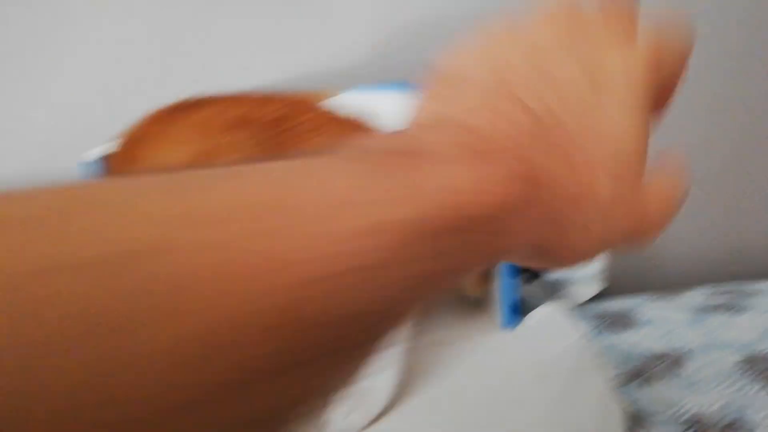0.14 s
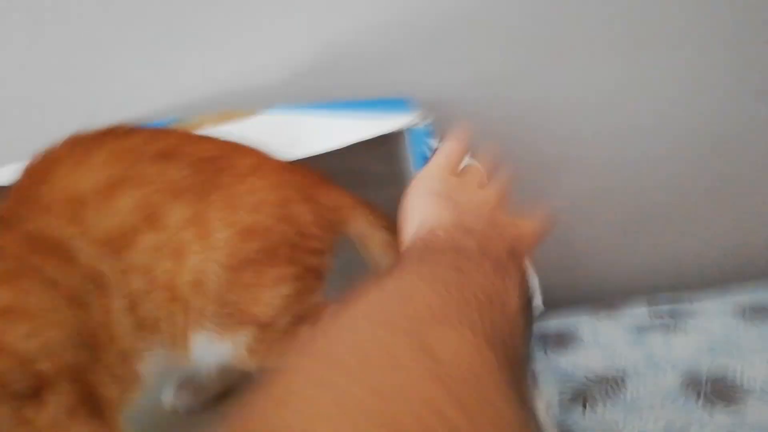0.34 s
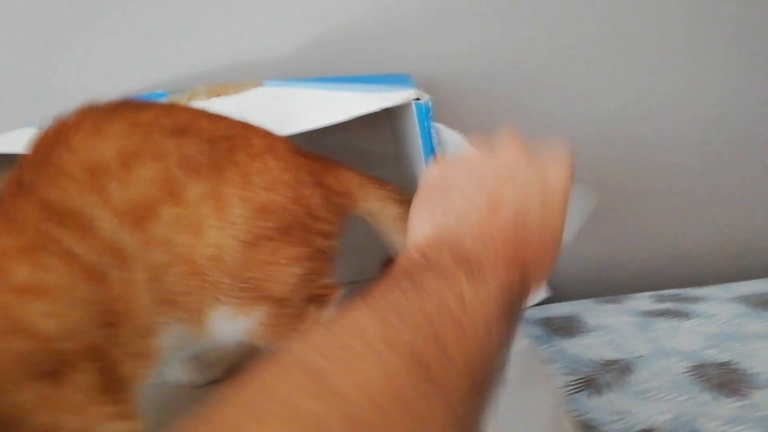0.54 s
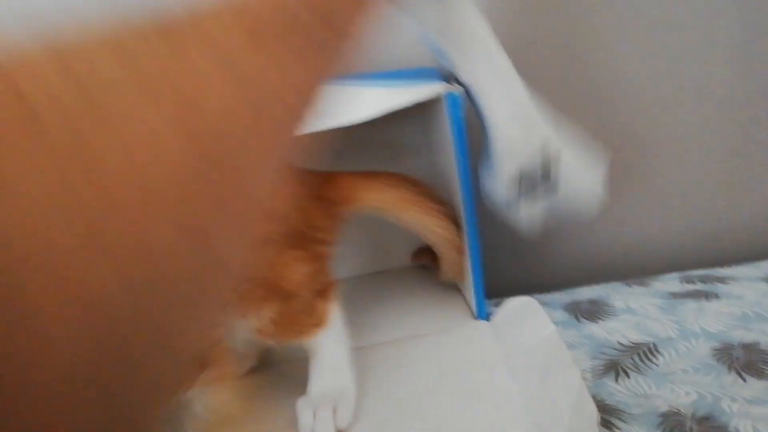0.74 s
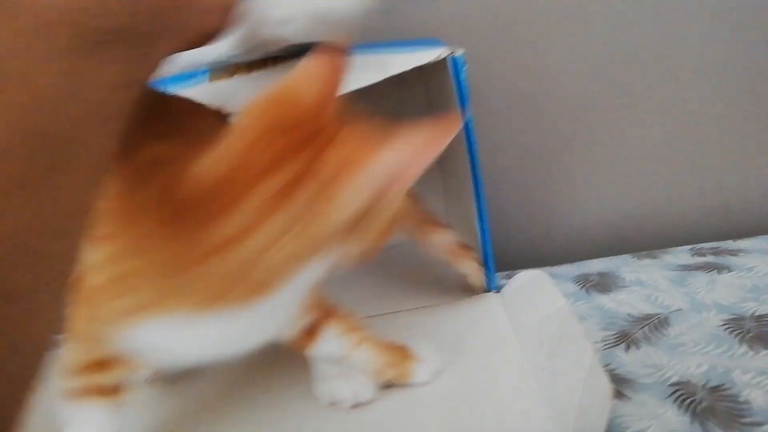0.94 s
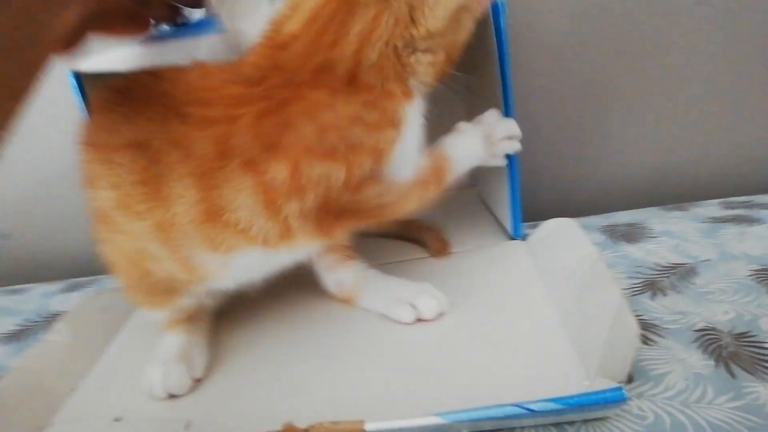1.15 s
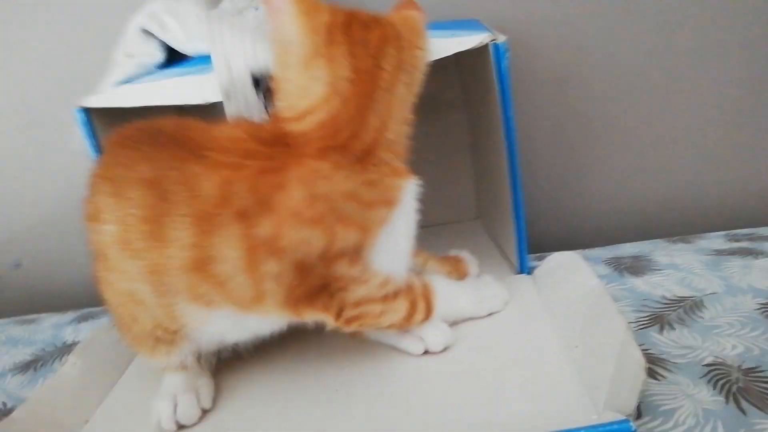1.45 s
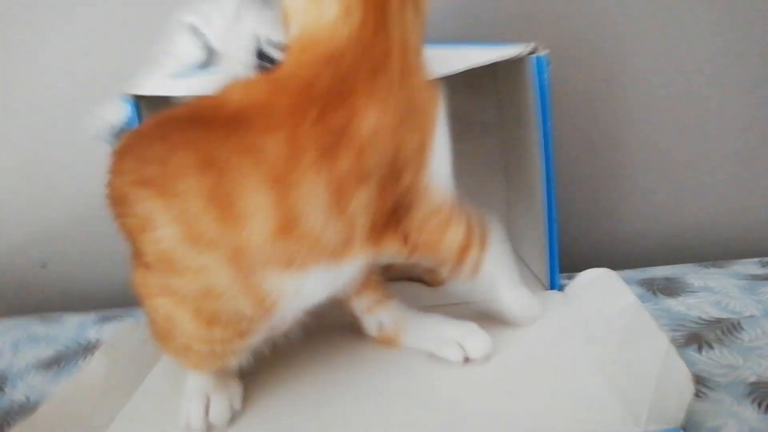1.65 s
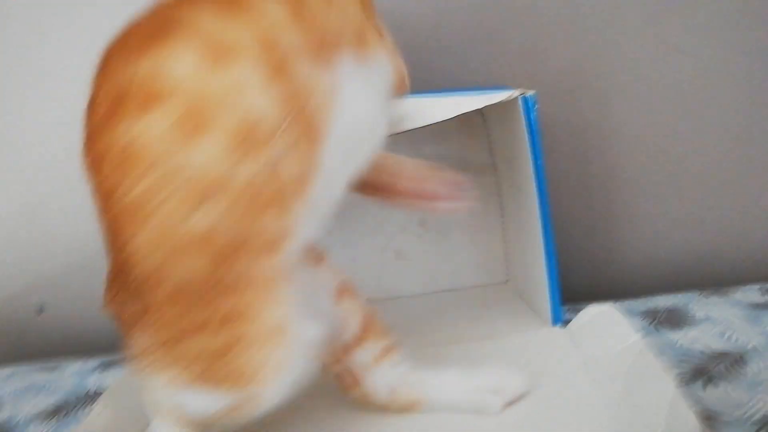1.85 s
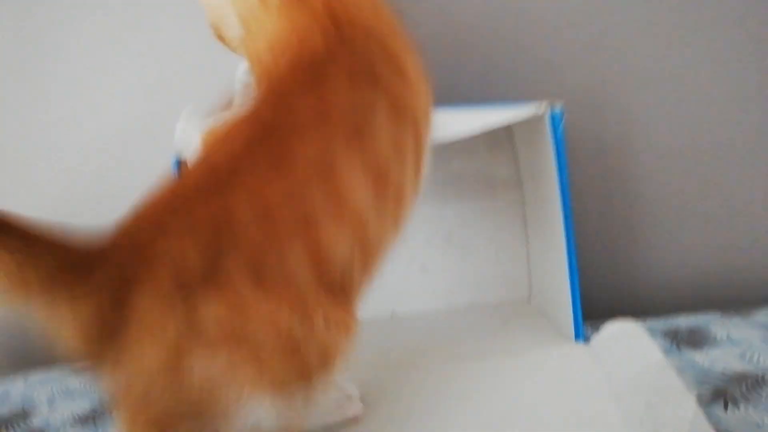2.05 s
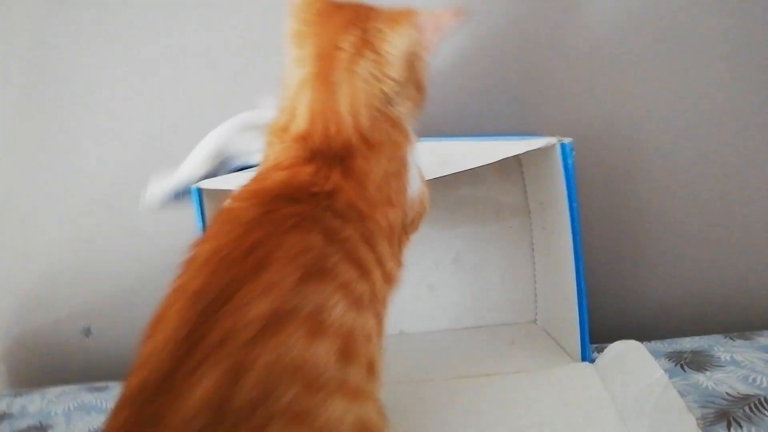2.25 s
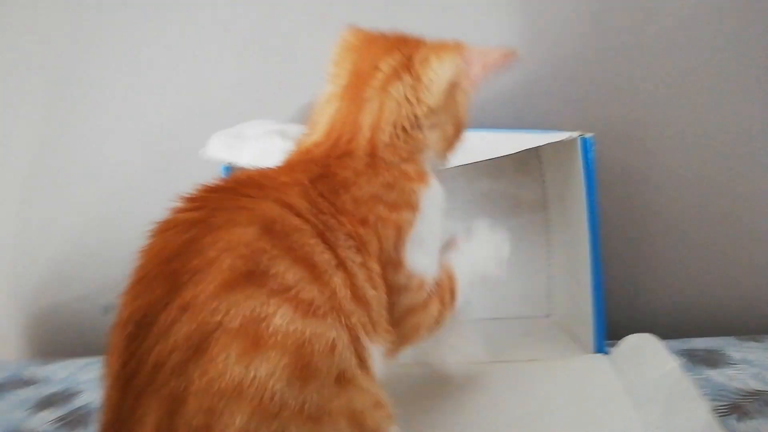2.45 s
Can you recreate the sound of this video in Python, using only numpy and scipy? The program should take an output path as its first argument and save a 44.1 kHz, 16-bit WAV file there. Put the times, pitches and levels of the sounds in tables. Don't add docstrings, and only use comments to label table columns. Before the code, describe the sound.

Cardboard box knocked, scratched and thumped by a lively kitten's paws, close up in a bedroom

```python
import sys
import numpy as np
from scipy import signal
from scipy.fft import rfft, irfft
from scipy.io import wavfile
from scipy.ndimage import uniform_filter1d

SR = 44100
rng = np.random.default_rng(int(sys.argv[2]) if len(sys.argv) > 2 else 0)


def digitize_waveform(pressure):
    field = np.atleast_2d(pressure).T
    bounded = np.clip(field, -1, 1)
    quanta = np.round(bounded * 32767).astype(np.int16)
    wavfile.write(sys.argv[1], SR, quanta)


def convert_level_to_amplitude(level_db):
    exponent = np.asarray(level_db, float) / 20
    return 10 ** exponent


N = 114660
T = np.arange(N) / SR


def evened(x):
    return x / np.sqrt(np.mean(x ** 2) + 1e-20)


def peaked(x):
    return x / abs(x).max(1).mean()


def read(points, hz):
    f, value = np.transpose(points)
    return np.interp(np.log(hz + 1), np.log(f + 1), value)


def sides(pan_db):
    return convert_level_to_amplitude([[pan_db / 2], [-pan_db / 2]])


def add(mix, start, sound, pan_db=0):
    part = mix[:, round(start * SR):][:, :sound.shape[-1]]
    part += (sound * sides(pan_db))[:, :part.shape[1]]


def resonate(x, hz, width_hz):
    turn = np.exp(2j * np.pi * np.cumsum(hz * np.ones(x.shape[-1])) / SR)
    r = np.exp(-np.pi * width_hz / SR)
    return 2 * (turn * signal.lfilter([1 - r], [1, -r], x / turn)).real


def pair(colour, grain=1., patchy_db=0.):
    # pitch in Hz, likeness from 0 to 1.
    likeness = [(100, 1), (250, 0.87), (600, 0.022), (1300, 0.31), (4000, 0.011)]
    noise = rng.standard_normal((2, N)) * grain
    hz, _, z = signal.stft(noise, SR, nperseg=1024, noverlap=768)
    same = np.clip(read(likeness, hz), 0, 1)[:, None]
    patches = rng.standard_normal(z.shape[1:])
    patches = evened(uniform_filter1d(uniform_filter1d(patches, 14, 0), 6, 1))
    z = np.array([z[0], same * z[0] + np.sqrt(1 - same ** 2) * z[1]])
    z = z * convert_level_to_amplitude(read(colour, hz)[:, None] + patchy_db * patches)
    return evened(signal.istft(z, SR, nperseg=1024, noverlap=768)[1][:, :N])


def flicker(seconds, db):
    width = max(int(seconds * SR), 1)
    wobble = uniform_filter1d(uniform_filter1d(rng.standard_normal(N), width), width)
    return convert_level_to_amplitude(db * evened(wobble))


def ring(hz, t60, rise_s=0.00036):
    t = np.arange(int(t60 * SR) + 9) / SR
    return np.minimum(t / rise_s, 1) * convert_level_to_amplitude(-60 * t / t60) * np.sin(2 * np.pi * hz * t)


def rattle(length, same=0.8):
    fade = np.exp(-(np.arange(500) / SR / length) ** 3)
    a, b = rng.standard_normal((2, 500)) * fade
    return np.array([a, same * a + np.sqrt(1 - same ** 2) * b])


def fur():
    # time in seconds, level in dB.
    brushing = [(0, -66.5), (.2, -54), (.45, -46), (.62, -56), (.78, -47.5), (0.879, -52), (1.002, -35.5),
                (1.078, -38.5), (1.14, -53), (1.3, -56.5), (1.551, -54), (1.78, -50), (1.947, -39.5),
                (2.005, -49.5), (2.06, -50.5), (2.075, -42), (2.33, -44.5), (2.6, -51.5)]
    # pitch in Hz, level in dB.
    fur_colour = [(300, -3.5), (1500, -1), (3000, -5.5), (4500, -3), (6500, -6.5), (9000, -3), (12000, -3),
                  (16000, -19)]
    s, db = np.transpose(brushing)
    grain = flicker(0.018, 1.47) * flicker(0.0093, 1.07)
    return pair(fur_colour, grain, patchy_db=1.6) * convert_level_to_amplitude(np.interp(T, s, db)) * sides(-2)


def bed():
    # time in seconds, level in dB.
    shifting = [(0, -44), (.1, -54.5), (.17, -51), (0.211, -44.5), (.26, -50), (.5, -45), (.7, -47),
                (.9, -50.5), (1.08, -43), (1.4, -52.5), (1.65, -44), (1.95, -41), (2.04, -45.5),
                (2.15, -36), (2.26, -52.5), (2.6, -46)]
    # pitch in Hz, level in dB.
    bed_colour = [(22, -49), (36, -6), (56, 7.5), (90, -18), (200, -16.5), (500, -48)]
    s, db = np.transpose(shifting)
    return pair(bed_colour) * convert_level_to_amplitude(-0.5 + np.interp(T, s, db))


def thumps():
    # start in seconds, peak in dB, pitch in Hz, 60 dB fade in seconds.
    panel_hits = [(0.191, -44, 71, 0.21), (0.504, -39, 89, 0.036), (0.435, -31, 96, 0.1),
                  (.592, -29.5, 160, 0.039), (1.294, -30, 404, 0.12), (0.94, -33, 193, 0.049),
                  (1.047, -38, 114.5, 0.15), (1.169, -40, 183.5, 0.17), (1.295, -24, 253, 0.089),
                  (1.308, -29, 183, 0.092), (1.3214, -19, 142, 0.034), (1.542, -25.5, 200, 0.025),
                  (1.552, -28.5, 113.6, 0.088), (1.593, -32.5, 60, 0.12), (1.619, -29, 132, 0.097),
                  (1.634, -32, 266, 0.11), (1.646, -30.5, 81, 0.16), (1.681, -36.5, 111.2, 0.31),
                  (1.774, -35.5, 104.7, 0.27), (1.852, -28, 137, 0.044), (1.875, -26.5, 98, 0.077),
                  (1.937, -36, 76, 0.23), (2.072, -19.5, 170.3, 0.097), (2.122, -40.5, 123, 0.13),
                  (2.163, -37, 71.4, 0.19)]
    scuff_db, scuff_hz = -10, 326
    out = np.zeros((2, N))
    for start, db, hz, t60 in panel_hits:
        add(out, start, -convert_level_to_amplitude(db + 0.5) * ring(hz, t60, 0.0025))
        rub = rattle(1, same=0.88).repeat(8, axis=1)
        rub = resonate(rub, scuff_hz / 2, scuff_hz)
        rub = evened(resonate(rub, scuff_hz / 2, scuff_hz * 2))
        fade_db = -60 * np.arange(4000) / SR / (t60 + 0.021)
        add(out, start, convert_level_to_amplitude(db + scuff_db + fade_db) * rub)
    return out


def drags():
    # start in seconds, length in seconds, level in dB,
    # hollow pitch in Hz, wide scratch in dB beside the hollow.
    slides = [(0.269, 0.27, -64.5, 1380, 11), (0.415, 0.05, -48, 990, 9.5), (0.438, 0.12, -60, 900, 11.5),
              (0.609, 0.32, -45.5, 1378, 0.5), (0.96, 0.12, -54.5, 1460, 1.5),
              (1.185, 0.051, -41.5, 1290, 2), (1.232, 0.072, -52.5, 1500, 15.5),
              (1.293, 0.034, -52, 1730, 22), (1.325, 0.07, -52, 1600, 13), (1.37, 0.12, -59.5, 2110, 10),
              (1.673, 0.13, -46.5, 890, -0.5), (1.762, 0.088, -44, 1150, -2.5),
              (1.843, 0.078, -47, 1180, 4.5), (1.917, 0.08, -76.5, 1500, -1), (.64, 0.079, -51, 300, -11),
              (0.723, 0.1, -54.5, 410, -24), (2.477, 0.15, -59, 250, -29), (1.606, 0.061, -48, 347, -21),
              (0.42, 0.058, -51.5, 396, -20), (2.063, 0.066, -64, 1390, 16.5),
              (2.112, 0.16, -51.5, 1330, -1), (2.222, 0.19, -49, 1240, -3.5),
              (2.528, 0.094, -47.5, 1050, -2)]
    # pitch in Hz, level in dB.
    scratch_colour = [(350, -3), (750, -2), (2000, 0), (2900, -4.5), (4000, -1.5), (6500, -12),
                      (10000, -10.5), (16000, -28)]
    grit_per_s, grit_db, glide_share = 1500, 1.5, 0.13
    upper_ratio, upper_db = 1.44, -11
    slips = rng.random(N) < grit_per_s / SR
    grit = 0.4 + slips * convert_level_to_amplitude(grit_db * np.minimum(rng.exponential(1, N), 3))
    scratch = pair(scratch_colour, grit * flicker(0.005, 0.62), patchy_db=1.5)
    out = np.zeros((2, N))
    for start, length, db, hz, wide_db in slides:
        part = scratch[:, round(start * SR):][:, :round(length * SR)]
        u = np.arange(part.shape[1]) / (length * SR)
        width = hz / (1.5 + 60 * length ** 2)
        glide = hz * (1 + glide_share * (u - 0.5))
        hollow, upper = (evened(resonate(resonate(part, f, width), f, 2 * width))
                         for f in (glide, upper_ratio * glide))
        shape = np.minimum(u / 0.15, 1) * np.minimum((1 - u) / 0.29, 1) * convert_level_to_amplitude(db - 4.5 * u)
        sound = hollow + convert_level_to_amplitude(upper_db) * upper + convert_level_to_amplitude(wide_db) * part
        add(out, start, shape * sound, -1.5 - 1.4 * start)
    return out


def snags():
    # start in seconds, peak in dB, pitch in Hz,
    # length in seconds, left over right in dB.
    catches = [(.328, -36, 3300, 0.0032, 4), (.329, -41, 1410, 0.005, -2), (.353, -34, 3300, 0.0019, 3),
               (0.6897, -26.5, 8000, 0.0011, -11), (0.6905, -29, 12000, 0.001, -10),
               (.692, -37.5, 7800, .014, -3), (.7, -37, 8000, .002, -7), (.724, -39, 8900, 0.0046, 4),
               (.7428, -32, 12000, .002, -5), (0.743, -39, 8800, .002, 0),
               (0.758, -33.5, 12000, 0.0045, -14), (.761, -35.5, 12000, 0.0043, -7.5),
               (0.772, -33, 8100, 0.0036, -8), (.775, -31, 11900, 0.0043, -6),
               (0.7761, -28.5, 9250, 0.0019, 5), (.7758, -32, 14000, .002, -2),
               (.776, -28.5, 4830, 0.0023, -5), (0.79, -46, 4000, .002, 2), (0.94, -51, 11800, 0.0037, 4),
               (0.971, -28, 7900, 0.0049, 3), (0.973, -33, 4500, 0.0026, 1.5), (.993, -31, 10300, .003, 13),
               (1.068, -30.5, 3750, 0.0024, 7), (1.097, -32.5, 3700, 0.0037, 10),
               (2.069, -34, 3860, 0.0034, -4), (2.0702, -31, 8050, .003, 2),
               (2.0704, -27, 12200, 0.012, -7), (2.081, -30, 9960, 0.0069, -2)]
    width_hz, wide_db = 1200, -8
    out = np.zeros((2, N))
    for start, db, hz, length, pan_db in catches:
        t = np.arange(2000) / SR / length
        noise = np.hstack([rattle(1) for _ in range(4)])
        tone = evened(resonate(resonate(noise, hz, width_hz), hz, 2 * width_hz))
        wide = evened(resonate(resonate(noise, 6900, 4300), 10000, 9000))
        tick = (tone + convert_level_to_amplitude(wide_db) * wide) * t * np.exp(-2 * t)
        add(out, start, convert_level_to_amplitude(db + 5.5) * tick, pan_db)
    return out


def knocks():
    # start in seconds, peak in dB, contact time in milliseconds.
    claw_tips = [
        (.4243, -30, .1),
        (.5935, -31, .16),
        (.6183, -31, .13),
        (1.0455, -33, .2),
        (1.2929, -9.5, .07),
        (1.2936, -11, .07),
        (1.543, -37, .2),
        (2.0703, -26, .08),
        (2.1695, -34, .07),
    ]
    out = np.zeros((2, N))
    for start, db, contact_ms in claw_tips:
        u = T[:400] * 1000 / contact_ms - 2
        push = np.exp(-u ** 2)
        swing_back = 0.4 * np.exp(-((u - 3.2) / 2.2) ** 2)
        add(out, start, -convert_level_to_amplitude(db) * (push - swing_back)[None])
    return out


def taps():
    # start in seconds, peak in dB, ring pitch in Hz.
    wall_taps = [(0.593, -41, 620), (0.6172, -29.5, 1260), (0.676, -32.5, 1330), (0.724, -39, 1330),
                 (0.971, -30.5, 1520), (1.069, -32, 1400), (1.098, -36, 1410), (1.545, -39.5, 1040),
                 (1.638, -37, 405), (1.677, -46, 1170), (1.687, -35, 1320), (1.6996, -26.5, 1280),
                 (1.701, -27.5, 574), (1.71, -30.5, 1350), (1.715, -29.5, 636), (1.733, -34, 635),
                 (1.775, -34.5, 1210), (1.779, -37, 1310), (1.81, -54, 1010), (1.852, -28.5, 1130),
                 (1.864, -32.5, 970), (1.874, -35, 1500), (1.887, -42, 1100), (2.0705, -31, 1480),
                 (2.109, -36, 1260), (2.1613, -28, 1310), (2.342, -40, 1160)]
    out = np.zeros((2, N))
    for start, db, hz in wall_taps:
        note = ring(hz, 0.013, rise_s=0.00064)
        add(out, start, convert_level_to_amplitude(db) * peaked(signal.fftconvolve(rattle(0.003), note[None])), -4)
    return out


def slaps():
    # start in seconds, peak in dB, rattle length in seconds.
    hard_slaps = [
        (1.1643, -16, 0.0061),
        (1.1728, -22, 0.0035),
        (1.1745, -12.5, 0.0043),
        (1.2915, -17, 0.0028),
        (1.295, -16, 0.0011),
    ]
    # pitch in Hz, level in dB.
    wall_notes = [(620, -13.5), (1200, 0.5), (1680, -0.5), (2150, 2), (2700, -7.5)]
    crack_db, crack_hz, crack_width_hz = 6, 4500, 3600
    out = np.zeros((2, N))
    for start, db, length in hard_slaps:
        drive = rattle(length) * np.minimum(T[:500] / (0.31 * length), 1)
        wall = np.zeros((2, 4000))
        smooth = signal.lfilter([1, 2, 1], [1], drive)
        add(wall, 0, convert_level_to_amplitude(crack_db) * peaked(resonate(smooth, crack_hz, crack_width_hz)))
        for hz, note_db in wall_notes:
            note = ring(hz * rng.uniform(1.0, 1.04), 0.03 * 1200 / (hz + 600))
            add(wall, 0, convert_level_to_amplitude(note_db) * peaked(signal.fftconvolve(drive, note[None])))
        add(out, start, convert_level_to_amplitude(db) * peaked(wall), -1)
    return out


def echo(x):
    t = np.arange(12000) / SR
    tail = rng.standard_normal((2, 12000)) * convert_level_to_amplitude(-60 * t / 0.14) * (t > 0.002)
    tail = signal.lfilter([0.5], [1, -0.5], tail)
    tail = signal.lfilter([1, -1], [1, -0.93], tail)
    return signal.fftconvolve(x.mean(0)[None], tail / np.linalg.norm(tail[0]), axes=1)[:, :N]


def room():
    # pitch in Hz, level in dB per Hz.
    room_colour = [(60, 2), (200, -5), (600, -12), (1300, -12), (3000, -18.5), (7000, -35), (16000, -70)]
    return convert_level_to_amplitude(-60) * pair(room_colour, patchy_db=1.5)


def scene():
    near = thumps() + drags() + snags() + knocks() + taps() + slaps()
    return near + convert_level_to_amplitude(-11) * echo(near) + fur() + bed() + room()


def band_limit(x):
    return signal.sosfilt(signal.butter(12, 16460, fs=SR, output="sos"), x)


def record(dry):
    # pitch in Hz, width in Hz, level in dB.
    cancelled = [(543, 58, -4), (6280, 930, -0.5)]
    port_hz, port_width_hz, port_db = (10500, 11600), (1080, 540), (2.5, -6.5)
    ports = np.array([x + convert_level_to_amplitude(db) * resonate(x, hz, width)
                      for x, hz, width, db in zip(dry, port_hz, port_width_hz, port_db)])
    f = np.fft.rfftfreq(N, 1 / SR)
    tilt = -10 / (1 + (12000 / (f + 1)) ** 12)
    dips = convert_level_to_amplitude(sum(db * np.exp(-((f - hz) / width) ** 2) for hz, width, db in cancelled))
    edge = np.clip((15950 - f) / 150 + 0.5, 0.01, 1)
    gain = edge * dips * convert_level_to_amplitude(np.array([tilt / 2, -tilt / 2]))
    return band_limit(irfft(rfft(ports) * gain, N))


dry = scene()
out = record(dry)
digitize_waveform(out)
```